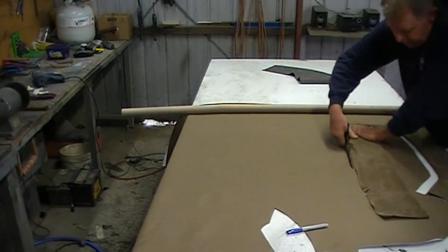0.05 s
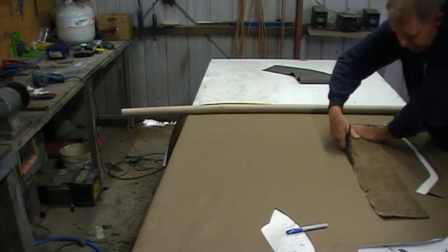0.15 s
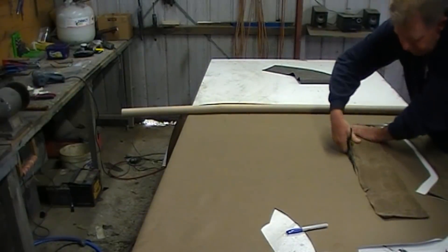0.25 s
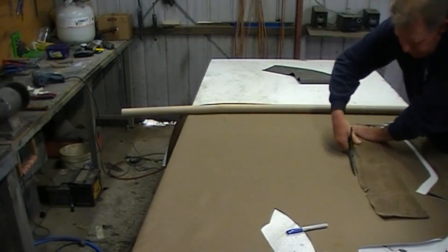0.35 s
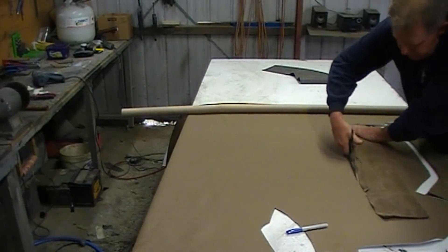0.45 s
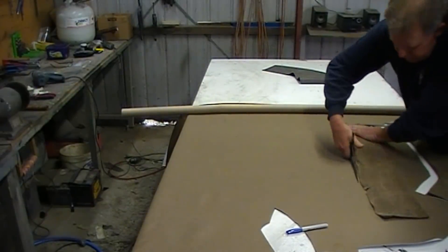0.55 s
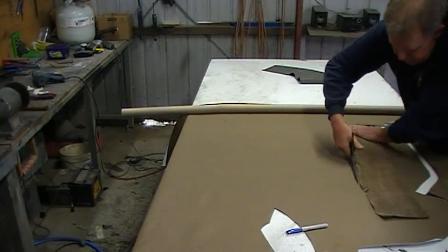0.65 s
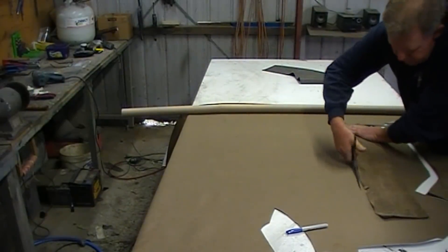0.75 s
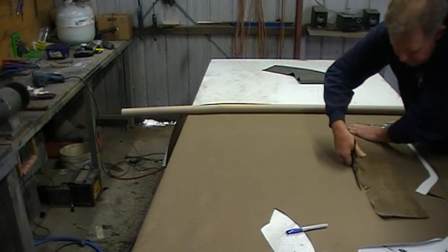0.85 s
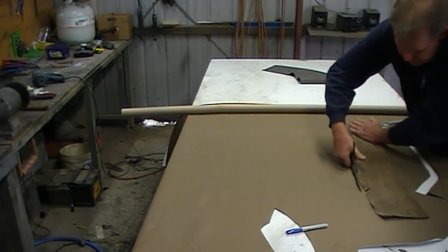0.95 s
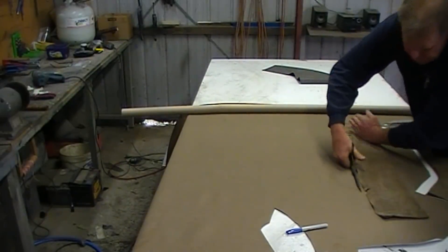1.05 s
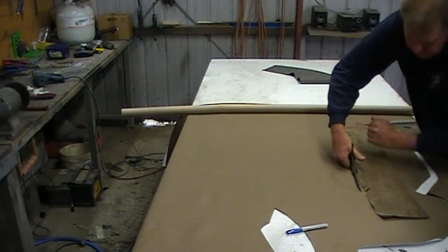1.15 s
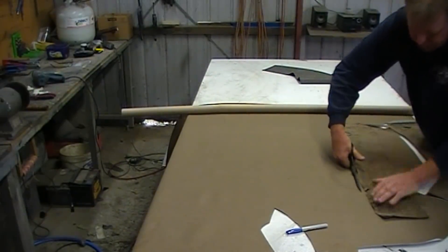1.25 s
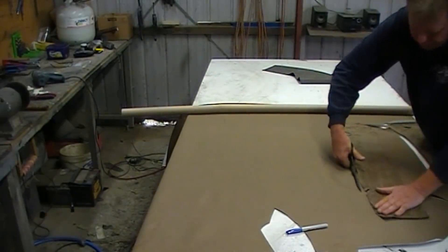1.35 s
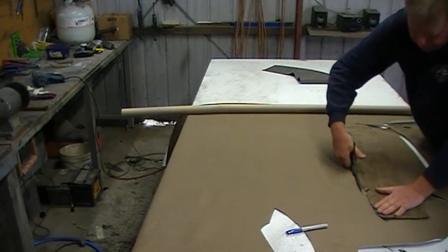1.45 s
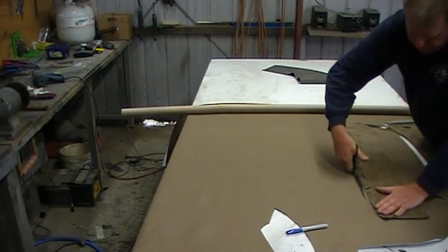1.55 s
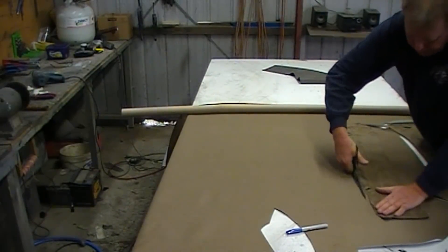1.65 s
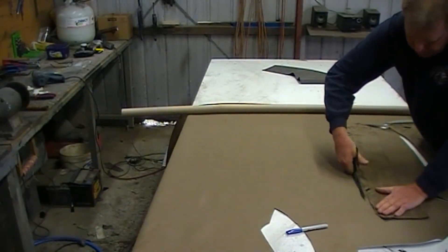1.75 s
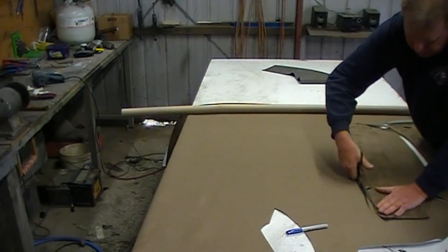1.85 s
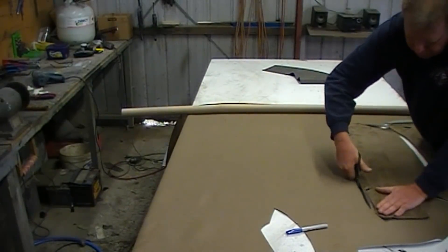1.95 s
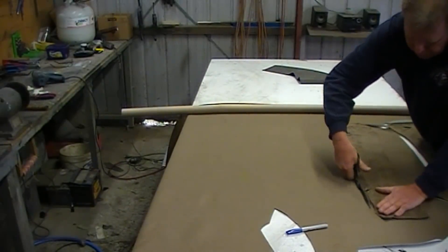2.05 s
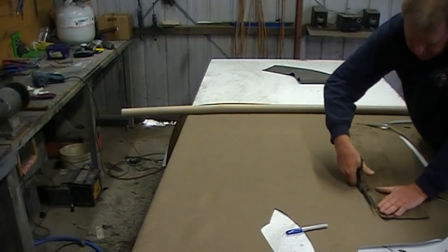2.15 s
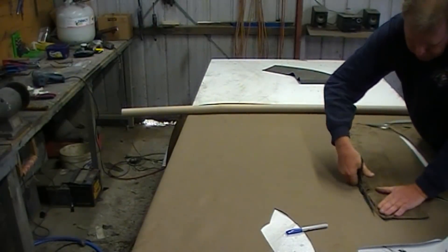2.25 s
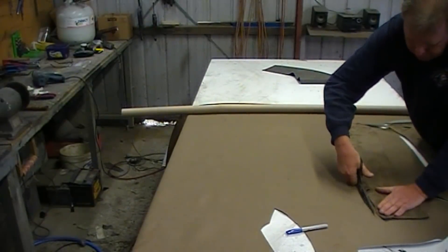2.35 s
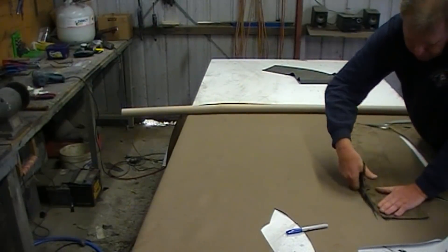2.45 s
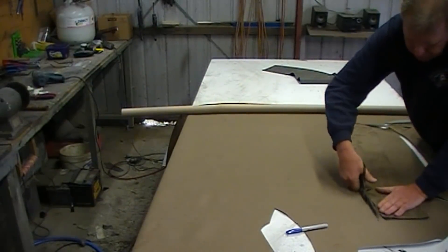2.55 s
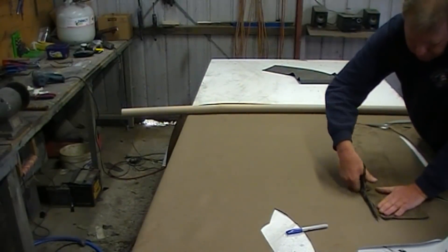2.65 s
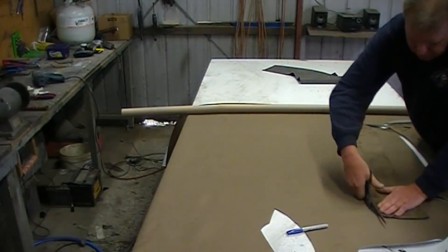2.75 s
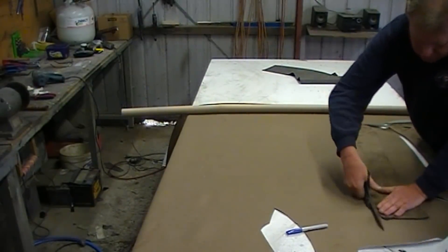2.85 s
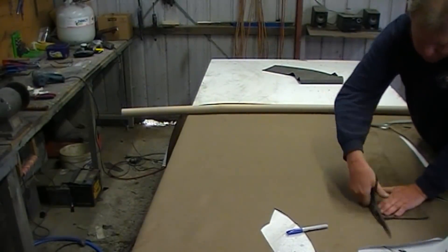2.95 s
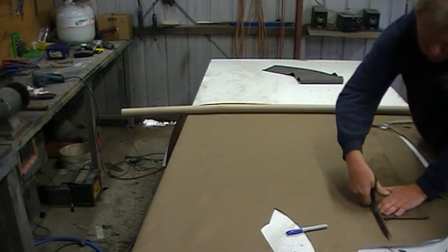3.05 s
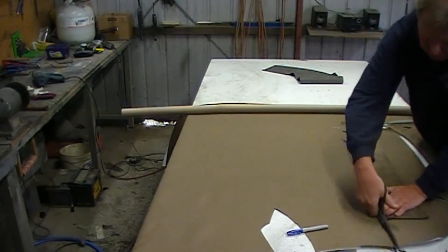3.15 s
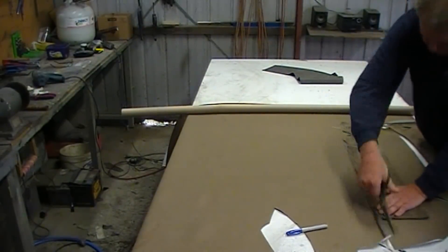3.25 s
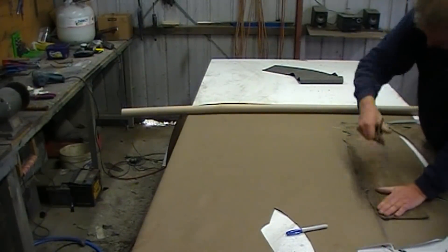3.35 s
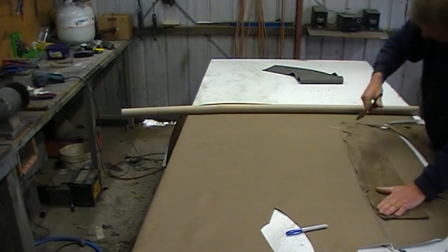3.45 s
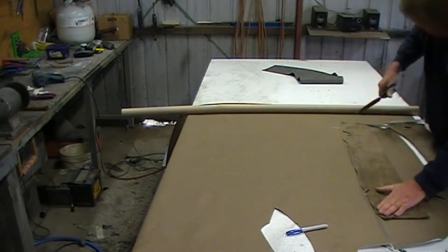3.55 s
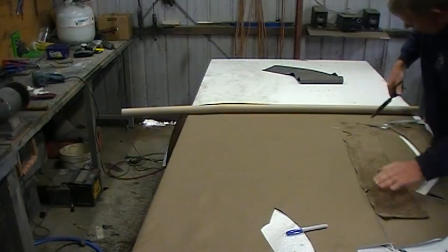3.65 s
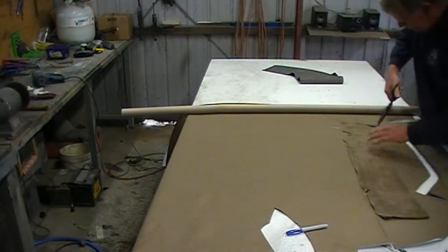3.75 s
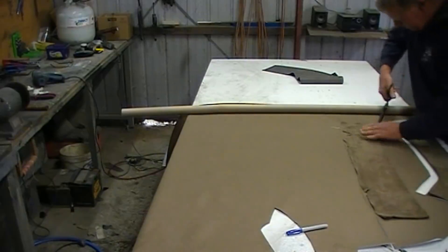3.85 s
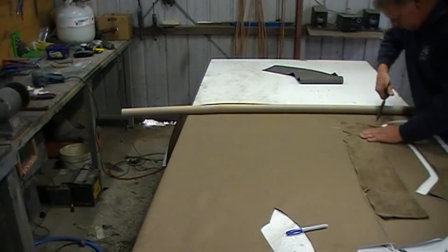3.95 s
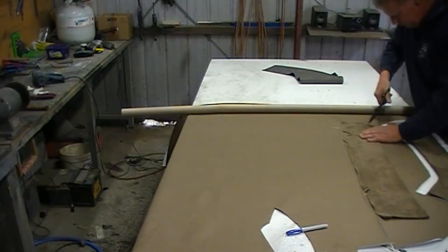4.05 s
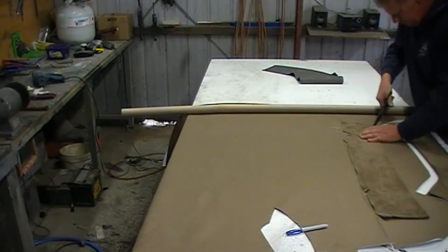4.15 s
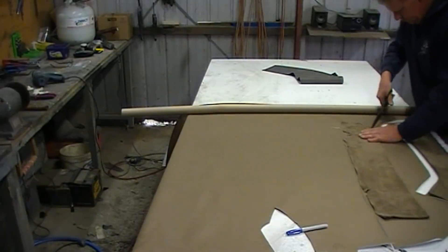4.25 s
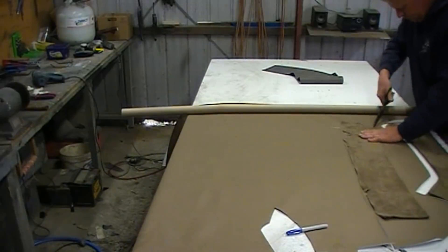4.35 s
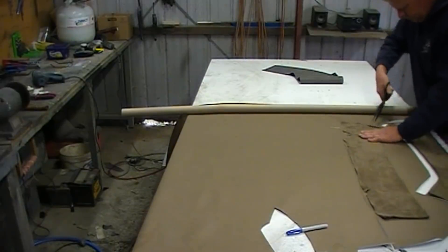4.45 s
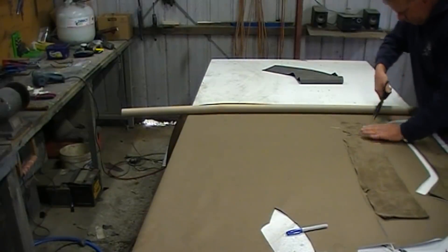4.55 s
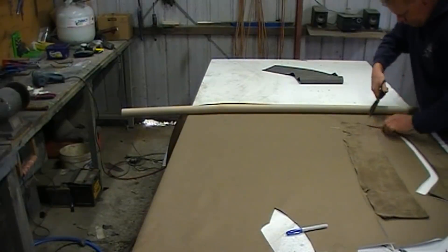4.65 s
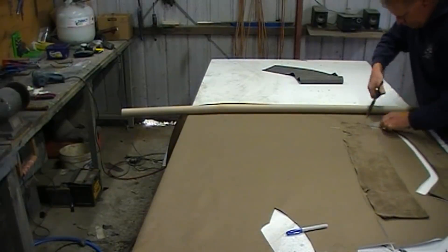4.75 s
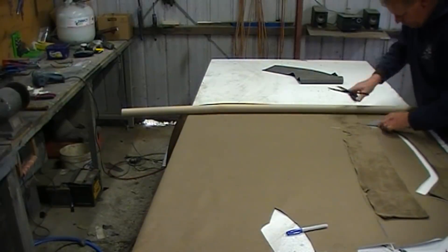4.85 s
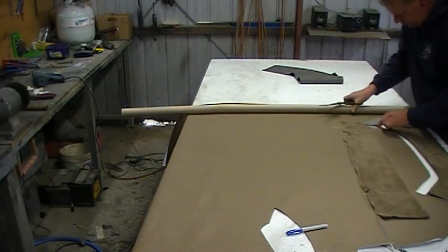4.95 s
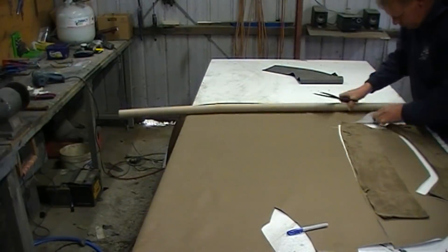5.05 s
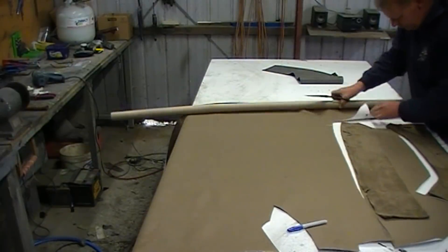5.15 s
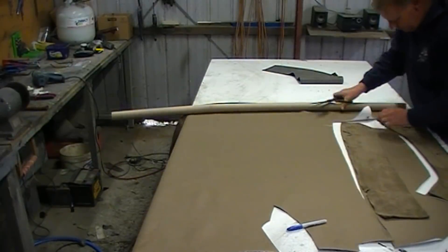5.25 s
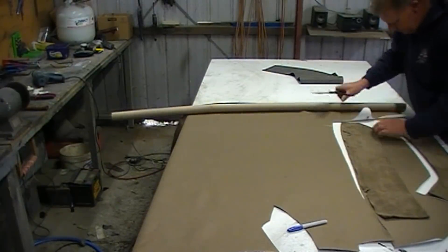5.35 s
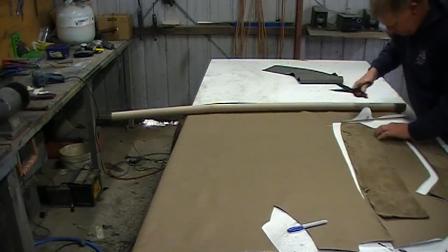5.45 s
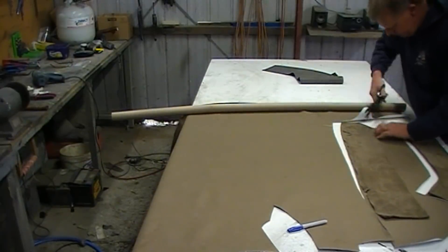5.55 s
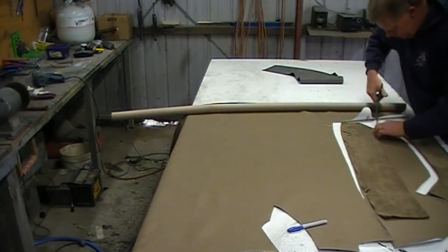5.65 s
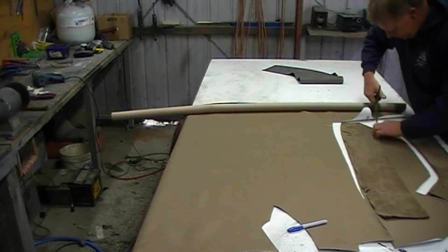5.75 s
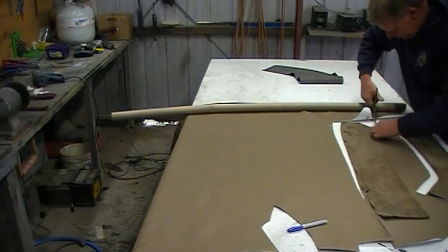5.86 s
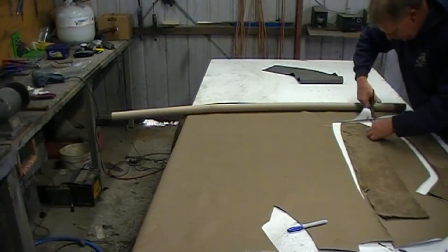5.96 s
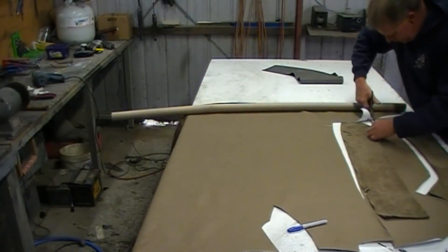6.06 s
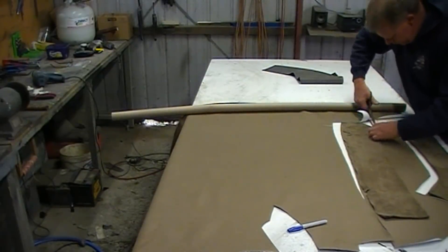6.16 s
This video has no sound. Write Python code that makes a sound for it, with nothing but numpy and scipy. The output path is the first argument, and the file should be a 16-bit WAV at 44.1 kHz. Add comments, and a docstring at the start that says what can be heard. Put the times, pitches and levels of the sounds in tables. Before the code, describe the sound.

Large metal shears cut heavy cloth on a wooden table: four crunching strokes, a short pause, then seven more, speeding up. Many end in a sharp steel clack, with woody knocks and faint blade rubs between. Cloth swishes, soft bumps follow, and finally a hollow cardboard roll is struck and skids. Heard from a few metres in a workshop with a short echo, low air noise and faint machine drone.

```python
"""Large steel shears cut heavy cloth on a wooden table in a workshop, a few metres from a camcorder.
In each stroke threads snap in a dense crunch that rings blades and table; most strokes clack shut.
Grains of friction rub the blades open, and filtered blows make the knocks of steel on the table.
Cloth hisses under hands as shaped noise; late on, a cardboard roll is struck and skids in tiny slips.
Behind it all lie an echo of decaying noise, steady air and a distant machine of wavering sines."""
import sys
import numpy as np
from scipy import signal
from scipy.fft import rfft, irfft, next_fast_len
from scipy.io import wavfile
from scipy.ndimage import map_coordinates

SR = 44100
rng = np.random.default_rng(int(sys.argv[2]) if len(sys.argv) > 2 else 0)


def to_wav(sig):
    """Store sig (one row per channel, or 1-D mono) as 16-bit WAV at the path in sys.argv[1].

    Samples outside -1..1 are clipped; the rate is SR.
    """
    pcm = np.clip(np.atleast_2d(sig), -1, 1) * 32767
    pcm = np.round(pcm).astype(np.int16)
    wavfile.write(sys.argv[1], SR, pcm.T)  # frames by channels


N = 273861
T = np.arange(N) / SR
SIZE = 4096  # samples in a ring

# strokes of the shears, also read by openings, clacking and cloth: bite t/s, stop t/s, level/dB,
# surge t/s, surge length/s, surge level/dB, blade ring f/Hz, table level/dB against the blades,
# follow-through level/dB, its table level/dB, clack level/dB, opening rub level/dB
STROKES = [(0.08, 0.115, -19.5, .106, .02, -0.5, 3380, -1.5, -37, 7, -28, -42),
           (0.389, .4304, -21.5, .393, .008, 5.5, 3383, -3, -33, 9, -18.5, -49.5),
           (.676, 0.717, -24.5, .709, 0.024, 5.5, 3180, -0.5, -37, 3.5, -62, -44),
           (0.938, 0.9793, -20, .964, 0.012, 9, 3360, -1, -33, 5, -23.5, -43.5),
           (1.743, 1.7811, -21.5, 1.768, 0.011, -14, 3350, -0.5, -33.5, -0.5, -25.5, -43),
           (2.029, 2.072, -19, 2.059, 0.026, 14, 3393, -6, -30.5, -3.5, -65, -43.5),
           (2.341, 2.381, -22, 2.372, 0.008, 3.5, 3320, -2.5, -31.5, -4.5, -65, -44),
           (2.644, 2.6783, -19.5, 2.670, 0.0086, 11, 3390, -4.5, -33, 3, -26, -46.5),
           (2.878, 2.9045, -19.5, 2.899, 0.0073, 2.5, 3550, -1.5, -28, -1.5, -22.5, -39),
           (3.061, 3.0813, -22, 3.076, .016, 3, 3356, 1, -23.5, -3, -23, -36.5),
           (3.253, 3.2716, -20, 3.264, .012, 2, 3430, -7.5, -58, -5, -23.5, -41)]
FIBRE_DB, FOLLOW_FIBRE_DB = -15, -15.5  # fibre hiss against the blade ring
FOLLOW_S, FOLLOW_FADE_DB = .05, -16.5  # the blades push on briefly after they stop


def cutting():
    """Each stroke is a steady squeeze that swells or dips once with the cloth's thickness, then fades out."""
    out = np.zeros(N)
    for start, stop, db, surge_s, surge_length_s, surge_db, hz, table_db, follow_db, follow_table_db, *_ in STROKES:
        t = start + T[:int((stop - start) * SR)]
        squeeze_db = surge_db * np.exp(-(2 * (t - surge_s) / surge_length_s) ** 4 / 2)
        add(out, start, undb(db) * crunch(squeeze_db, hz, table_db, FIBRE_DB))
        fade_db = np.linspace(0, FOLLOW_FADE_DB, int(FOLLOW_S * SR))
        follow = crunch(fade_db, hz * .98, follow_table_db, FOLLOW_FIBRE_DB)
        add(out, stop, undb(follow_db) * follow)
    # keep the crunch free of deep bass
    return signal.sosfilt(signal.butter(4, 175, "high", fs=SR, output="sos"), out)


# blade resonances before tuning, also rung by rubbing: f/Hz, width/Hz, level/dB
BLADE = [(2879, 130, 0), (3194, 240, 1.5), (3310, 290, 0.5), (3670, 304, 0.5), (3200, 900, -18.5),
         (5350, 160, -17.5), (6950, 210, -12), (7000, 610, -31)]
BLADE_HZ = 3350  # a stroke with this ring leaves the blades untuned
# tabletop resonances before tuning, also rung by rubbing: f/Hz, width/Hz, level/dB
TABLE = [(302, 130, -18.5), (560, 196, -8), (813, 410, -1.5), (1041, 180, 0.5), (1420, 1420, -1),
         (1782, 230, 1), (1872, 73, 3.5), (2440, 470, -6)]
# spectrum of snapping fibres: f/Hz, level/dB
FIBRES = [(100, -52), (1000, -6), (4000, -1.5), (7000, 1.5), (9000, -6.5), (12000, 0.5), (16000, -8)]
TIP_TABLE_DB, TIP_FIBRE_DB = 2.5, 12.5  # table and fibres grow by this much from pivot to tips
SAG_PER_S = 2.534  # share of its pitch that the ring loses in a second


def crunch(effort_db, hz, table_db, fibre_db):
    """Threads snap one after another; each rings the blades and the table under them, and spits treble."""
    count = len(effort_db)
    travel = np.linspace(-.5, .5, count)
    # the weave gives way in bunches of threads, a few milliseconds apart
    knots = np.arange(0, count + SR / 300, SR / 300)
    bunches_db = 3.7 * np.interp(np.arange(count), knots, rng.standard_normal(len(knots)))
    grip = undb(effort_db + bunches_db) * (1 - np.exp(-T[:count] / 0.0017))
    threads = grip * snaps(count, rate=1000, scatter_db=3.5)
    fraying = grip * snaps(count, rate=3400, scatter_db=1.0) * undb(TIP_FIBRE_DB * travel)
    # the ring sinks as the crossing point runs towards the tips
    blades = sag(excite(threads, body(BLADE, hz / BLADE_HZ)), count, fall=SAG_PER_S * count / SR)
    # every spot on the table answers at a slightly different pitch
    spot = body(TABLE, 1 + 0.025 * rng.uniform(-1.07, 1))
    table = excite(threads * undb(TIP_TABLE_DB * travel), spot)
    fibres = excite(fraying, click(FIBRES))
    return damp_peaks(blades) + undb(table_db) * damp_peaks(table) + undb(fibre_db) * fibres


def sag(x, count, fall):
    """Slide the pitch of a ring down by the share fall over count samples."""
    i = np.arange(len(x))
    place = np.cumsum(1 + fall * (.5 - np.minimum(i / count, 1)))
    return map_coordinates(x, [place], order=3)


def damp_peaks(x):
    """Cloth and friction damp large swings more than small ones."""
    return 1.37 * x / np.sqrt(1 + (abs(signal.hilbert(x)) / 2) ** 2)


# resonances of a woody knock before tuning, also played by knocking: f/Hz, width/Hz, level/dB
KNOCK = [(320, 190, -10.5), (562, 145, -7.5), (790, 290, 1), (1030, 71, -8), (1720, 240, -25.5)]
OPEN_ATTACK_S, OPEN_FADE_DB = .008, -3.5  # the blades break free at once and rub less as they part
# the longer the blades have rested shut, the harder they catch as they part
STICK_DB_PER_S, STICK_S = 13, 0.022


def rubbing():
    """Fine friction, catching and slipping, rings the same blades and table as the shears open."""
    out = np.zeros(N)
    blade, table, knock = body(BLADE, stretch=.94), body(TABLE, stretch=0.924), body(KNOCK, stretch=1.036)
    for start, end, db, rest_s in openings():
        count = max(int((end - start) * SR), SIZE // 8)
        pressure = np.minimum(T[:count] / OPEN_ATTACK_S, 1) * undb(np.linspace(0, OPEN_FADE_DB, count))
        catch = undb(STICK_DB_PER_S * rest_s * np.exp(-(T[:count] / STICK_S) ** 2))
        grit = snaps(count, rate=600, scatter_db=4) * pressure * catch
        rub = undb(-7) * excite(grit, blade)
        rub = rub + undb(-7.5) * excite(grit, table)
        rub = rub + undb(-10) * excite(grit, knock)
        add(out, start, undb(db) * rub)
    return out


# wait after a stroke, longest lead on the next, longest duration, share of the gap that it may fill
REOPEN_S, LEAD_S, OPEN_S, OPEN_SHARE = .085, .23, .135, .74


def openings():
    """Blades open soon after a stroke, or ahead of the next after a pause: start s, end s, level dB, rest s."""
    rows, last_stop = [], -.175  # the cutting is already under way
    for start, stop, *_, rub_db in STROKES:
        begin = max(last_stop + REOPEN_S, start - LEAD_S)
        end = begin + min(OPEN_S, OPEN_SHARE * (start - begin))
        rows.append((begin, end, rub_db, begin - last_stop))
        last_stop = stop
    return rows


# spectrum of steel shutting on steel: f/Hz, level/dB
CLACK = [(30, -16), (300, -16), (1000, -10), (3500, -9), (5500, -12), (8500, -12), (11500, -3), (14000, 3),
         (16000, 5), (17000, -15)]
IDLE_CLACK_S, IDLE_CLACK_DB = 3.96, -40


def clacking():
    """Steel meets steel in a millisecond of chatter as strokes end, and once with the shears empty."""
    out, steel = np.zeros(N), click(CLACK)
    age = T[:SIZE // 16]
    shuts = [(stop, clack_db) for _, stop, *_, clack_db, _ in STROKES]
    for s, db in shuts + [(IDLE_CLACK_S, IDLE_CLACK_DB)]:
        contact = rng.choice([-1, 1], len(age)) * np.exp(-(age / .0007) ** 2)
        add(out, s, blow(excite(contact, steel) / np.sqrt(len(age)), db))
    return out


# resonances of the bare blades: f/Hz, width/Hz, level/dB
STEEL_RING = [(3820, 460, 11), (4600, 1400, -14), (7700, 3000, -7.5), (13400, 1800, -0.5)]


def singing():
    """After the stroke that runs out of cloth, the bare blades scrape over each other and sing."""
    age, start_s, length_s = T[:SIZE * 2], 3.274, .085
    stroke = np.exp(-(age / length_s) ** 4)  # the hand stops quite suddenly
    grit = snaps(len(age), rate=2200, scatter_db=4.5) * stroke
    out = np.zeros(N)
    add(out, start_s, undb(-34.0) * excite(grit, body(STEEL_RING)))
    return out


# the lower blade knocking on the table: t/s, level/dB before the trim of each layer
KNOCKS = [(.071, -22.5), (0.3604, -25), (.6605, -22.5), (.932, -35), (1.7292, -20), (2.013, -32.5),
          (2.870, -21.5), (3.0504, -17), (3.244, -26.5)]
# spectrum of the steel tick: f/Hz, level/dB
TICK = [(80, -47), (500, 9), (1700, -8), (2700, -1), (3900, -2.5), (5500, -31), (7000, -19), (11000, -20.5),
        (16000, -25)]
KNOCK_TICK_DB = -29  # tick level, before half the level of its knock is added
# soft bumps of hands and shears on the cloth-covered table: t/s, level/dB before a trim
BUMPS = [(3.962, -37), (3.9683, -26.5), (4.266, -31.5), (4.4564, -32.5), (5.109, -38.5), (5.357, -40.5)]
# resonances of a padded bump: f/Hz, width/Hz, level/dB
BUMP = [(261, 82, 5.5), (382, 210, -3.5), (535, 158, 2.5), (640, 160, -3.5), (1120, 3200, -26.5)]


def knocking():
    """Steel on the table gives a tick and a woody knock; padded bumps wake mainly its low modes."""
    out, tick, thud = np.zeros(N), click(TICK), body(BUMP)
    for s, db in KNOCKS:
        ring = body(KNOCK, 1 + 0.034 * rng.uniform(-1.4, 1))
        add(out, s, blow(ring, db - 9.5))
        # the tick grows only half as fast as the knock
        add(out, s, blow(scatter(tick, late_db=5, decay_s=0.015), KNOCK_TICK_DB + db / 2))
        # the blade lands first, the weight of the hand a moment later
        add(out, s + 0.00368, blow(scatter(ring, late_db=-8, decay_s=0.035), db - 8))
    for s, db in BUMPS:
        add(out, s, blow(scatter(thud, late_db=-6, decay_s=0.0066), db - 6.0))
    return out


# cloth sliding as the blades open, and as they are pushed into the cut
OPEN_HISS_DB, PUSH_DB, PUSH_S = -53, -51, .085
# hands and shears sweeping over the cloth: start t/s, end t/s, level/dB, brightness/(dB per octave)
SWEEPS = [(1.021, 1.423, -59, -4), (3.268, 3.392, -39, -1), (3.342, 3.47, -49.5, 0),
          (3.84, 3.904, -58.5, -1), (3.942, 3.995, -48.5, 0.5), (4.016, 4.121, -44.5, 4),
          (4.431, 4.62, -62.5, 7), (5.043, 5.123, -57.5, -3.5), (5.109, 5.33, -52.5, 0.5)]


def cloth():
    """Cloth slides as the blades open, as they are pushed into the cut, and under sweeping hands."""
    out = np.zeros(N)
    for start, end, *_ in openings():
        add(out, start, undb(OPEN_HISS_DB) * swish(end - start, tilt_db=1.1))
    for start, *_ in STROKES:
        add(out, start - PUSH_S / 2, undb(PUSH_DB) * swish(PUSH_S, tilt_db=1.0))
    for start, end, db, tilt_db in SWEEPS:
        add(out, start, undb(db) * swish(end - start, tilt_db))
    return out


# spectrum of sliding cloth before the tilt: f/Hz, level/dB
CLOTH = [(40, -31), (200, 1.5), (600, 10), (1500, 5.5), (4000, 4.5), (8000, -2.5), (12000, -3),
         (16000, -1.5)]


def swish(length_s, tilt_db):
    """The weave hisses as it slides, swelling and fading with the speed of the hand."""
    count = max(int(length_s * SR), SIZE // 8)
    hiss = colour(snaps(count, rate=5000, scatter_db=4.5), CLOTH, tilt_db)
    return unit(hiss * np.sin(np.linspace(0, np.pi, count)))


# the cardboard roll being struck and rocking: t/s, hollow thump level/dB, sharp tick level/dB
ROLL_HITS = [(5.8242, -28.5, -26), (5.8307, -24.5, -34.5), (5.879, -37.5, -44), (5.925, -40, -41),
             (5.953, -37.5, -50), (5.994, -39, -58), (6.083, -48.5, -75)]
# resonances of the hollow roll: f/Hz, width/Hz, level/dB
ROLL = [(286, 120, -6.5), (440, 170, -6), (548, 104, 3.5), (646, 115, 3.5), (754, 100, 0), (913, 120, -5.5),
        (1150, 220, -9), (1590, 380, -13)]
# spectrum of the tick on cardboard: f/Hz, level/dB
ROLL_TICK = [(80, -49), (400, -5), (1200, 8.5), (1900, -6), (2700, 5.5), (3600, 0.5), (5500, -18),
             (7200, -17.5), (9000, -24), (16000, -23)]
SKID_S, SKID_DB, SKID_HOLD_S, SKID_FADE_S = 5.875, -34, 0.047, .035  # it slides, then coasts to rest


def roll():
    """The shears strike the cardboard roll; it thumps on the table, then judders and scrapes along it."""
    age = T - SKID_S
    speed = np.clip(age / 0.0065, 0, 1) * np.exp(-np.maximum(age - SKID_HOLD_S, 0) / SKID_FADE_S)
    ring, tick = body(ROLL), click(ROLL_TICK)
    slips = undb(SKID_DB) * speed * unit(snaps(N, rate=700, scatter_db=1))
    judder = signal.fftconvolve(slips, ring)
    # the scrape dies before the hollow ring as the roll slows
    scrape = undb(-8.5) * signal.fftconvolve(slips * speed, tick)
    out = (judder + scrape)[:N]
    for s, thump_db, tick_db in ROLL_HITS:
        add(out, s, blow(scatter(ring, late_db=-8.0, decay_s=0.017), thump_db))
        add(out, s, blow(scatter(tick, late_db=-1.0, decay_s=0.02), tick_db))
    return out


# stereo width of sounds on the table and their echo: f/Hz, side against mid level/dB
WIDTH = [(30, -25), (250, -20), (600, -21), (1200, -18.5), (2800, -16), (5000, -14), (14000, -10.5)]


def housing(x):
    """Sound from the front bends round the camera body, reaching each capsule with its own phase."""
    size = next_fast_len(N)
    hz = np.fft.rfftfreq(size, 1 / SR)
    ripple_hz = 1900
    skew = 1j * np.sqrt(2) * np.cos(2 * np.pi * hz / ripple_hz) * undb(along(WIDTH, hz))
    side = irfft(rfft(x, size) * skew, size)[:N]
    return np.array([x + side, x - side])


def microphone(x, width=WIDTH):
    """Two close capsules: sound from all around differs a little between them."""
    turn = np.exp(2j * np.pi * rng.random(len(x) // 2 + 1))
    side = colour(irfft(rfft(x) * turn, len(x)), width)
    return np.array([x + side, x - side])


# the workshop's echo: f/Hz, reverberation time t/s, level/dB
ROOM = [(150, 0.045, -3), (505, 0.53, -6), (900, 0.36, -2.5), (1560, 0.21, -2), (3440, 0.36, -10.5),
        (6860, 0.33, 3.5), (14000, 0.22, -8.5)]


def workshop(x):
    """Walls and benches return a dense echo that builds in about a millisecond and decays octave by octave."""
    age, rows = T[:SIZE * 8], np.array(ROOM)
    noise = rfft(microphone(rng.standard_normal(len(age))))
    octave = np.log2(np.fft.rfftfreq(len(age), 1 / SR) + 1)
    echo = 0
    for centre in np.arange(6, 15):  # octaves from 64 Hz up
        t60 = along(rows[:, [0, 1]], 2 ** centre)
        db = along(rows[:, [0, 2]], 2 ** centre)
        fade = np.exp(-np.log(1000) * age / t60) * (1 - np.exp(-(age / 0.00097) ** 2))
        band = irfft(noise * np.maximum(1 - abs(octave - centre), 0))
        echo = echo + undb(db) * band * fade / np.linalg.norm(fade)
    return signal.fftconvolve(echo, x[None], axes=1)[:, :N]


# spectrum of the room's air noise: f/Hz, relative level/(dB per Hz)
AIR = [(15, -69), (25, -33), (114, -12.5), (157, -3), (195, -9.5), (317, -5), (363, -16), (416, -9),
       (503, -12.5), (775, -15), (1020, -16.5), (1940, -13.5), (7310, -32.5), (14400, -32.5),
       (16000, -35.5)]
AIR_DB = -55.5  # rms of the air before it is spread to stereo
# a distant machine: f/Hz, level/dB
DRONE = [(143, -66.5), (170, -73), (312, -77.5), (468, -80)]
# stereo width of the air and drone: f/Hz, side against mid level/dB
AIR_WIDTH = [(60, 3), (110, -15), (200, -9.5), (380, -2), (700, 2.5), (1290, -0.5), (2380, -4), (4400, 0.5),
             (8120, 0.5), (15000, -5)]


def background():
    """Steady air noise and the wavering drone of a distant machine."""
    size = next_fast_len(N)
    air = undb(AIR_DB) * unit(colour(rng.standard_normal(size), AIR))
    t = np.arange(size) / SR
    knots = np.arange(0, t[-1] + 1, .09)
    for hz, db in DRONE:
        waver, drift = (np.interp(t, knots, rng.standard_normal(len(knots))) for _ in range(2))
        air = air + undb(db + 2 * waver) * np.sin(2 * np.pi * hz * t + 0.73 * drift)
    return microphone(air, AIR_WIDTH)[:, :N]


def undb(db):
    """Decibels to gain."""
    return 10 ** (np.asarray(db) / 20)


def unit(x):
    """Scale to rms 1."""
    return x / np.sqrt(np.mean(x ** 2))


def along(points, hz):
    """Read (Hz, value) points on a log-frequency axis."""
    f, value = np.transpose(points)
    return np.interp(np.log(np.maximum(hz, 1)), np.log(f), value)


def add(out, s, x):
    """Mix x into out from time s."""
    i = int(s * SR)
    x, i = x[max(-i, 0):], max(i, 0)
    out[i:i + len(x)] += x[:len(out) - i]


def causal(gain):
    """The ring, of unit energy, that follows a click in a body with this gain curve."""
    # folding the cepstrum gives minimum phase: the energy comes as early as it can
    cepstrum = irfft(np.log(gain / gain.max() + 3e-4))[:SIZE // 2]
    cepstrum[0] /= 2
    ring = irfft(np.exp(rfft(2 * cepstrum, SIZE)))
    return ring / np.linalg.norm(ring)


def body(modes, stretch=1):
    """Click response of steep-sided resonances, all tuned by stretch."""
    hz = np.fft.rfftfreq(SIZE, 1 / SR) / stretch + 1
    power = 0
    for f, width, db in modes:
        detune = (hz ** 2 - f ** 2) / (hz * width)
        power = power + undb(db) ** 2 / (1 + detune ** 2) ** 2
    return causal(np.sqrt(power))


def click(points):
    """Click with a broad spectrum."""
    return causal(undb(along(points, np.fft.rfftfreq(SIZE, 1 / SR))))


def colour(x, points, tilt_db=0):
    """Filter x by a spectrum, tilted in dB per octave."""
    size = next_fast_len(len(x))
    hz = np.fft.rfftfreq(size, 1 / SR)
    gain = undb(along(points, hz) + tilt_db * np.log2(1 + hz / SR * 100))
    return irfft(rfft(x, size) * gain, size)[:len(x)]


def snaps(count, rate, scatter_db):
    """Unevenly spaced tiny impacts of uneven size, about rate a second."""
    at = np.cumsum(rng.gamma(2, SR / rate / 2, int(2 * rate * count / SR) + 10))
    at = (at - at[0]).astype(int)
    at = at[at < count]
    sizes = undb(scatter_db * rng.standard_normal(len(at)))
    return np.bincount(at, sizes * rng.choice([-1, 1], len(at)), count)


def excite(force, ring):
    """Drive a body; rms 1 over the time of the drive."""
    y = signal.fftconvolve(force, ring)
    return y * np.sqrt(len(force)) / np.linalg.norm(y)


def blow(ring, db):
    """One blow; for a ring of unit energy, db is that energy spread over 10 ms."""
    return ring * undb(db) * np.sqrt(SR / 100)


def scatter(ring, late_db, decay_s):
    """A blow followed by the bending waves that come back from the edges of the board."""
    age = T[:SIZE]
    late = rng.standard_normal(SIZE) * np.exp(-age / decay_s) * (1 - np.exp(-age / 0.0017))
    late = signal.fftconvolve(late, ring)[:SIZE]
    return ring + undb(late_db) * late / np.linalg.norm(late)


def scene():
    """Everything close by happens on the table, almost straight ahead."""
    direct = cutting() + rubbing() + clacking() + singing() + knocking() + cloth() + roll()
    # a gentle low cut keeps the nearby sounds free of rumble
    direct = signal.sosfilt(signal.butter(1, 70, "high", fs=SR, output="sos"), direct)
    near = undb(-1.5) * (housing(direct) + workshop(direct))
    balance_db = -.5  # first channel against the second
    return (near + background()) * undb(np.array([[balance_db], [-balance_db]]) / 2)


TOP_HZ = 16000


def record(dry):
    """The camcorder cuts the top with a steep low-pass."""
    return signal.sosfilt(signal.ellip(10, .2, 70, TOP_HZ, fs=SR, output="sos"), dry)


dry = scene()
out = record(dry)
to_wav(out)
```